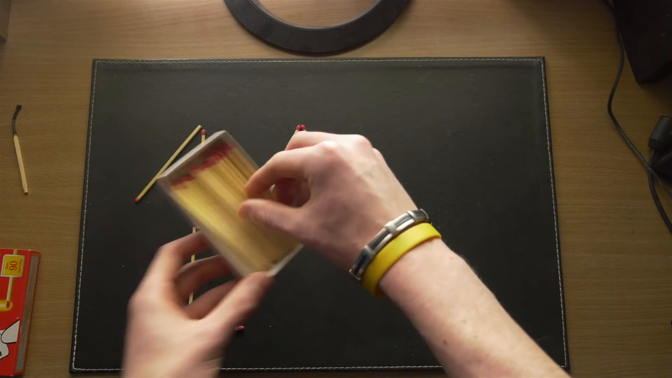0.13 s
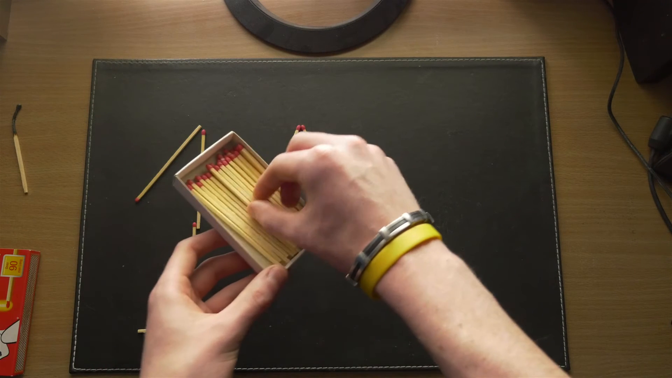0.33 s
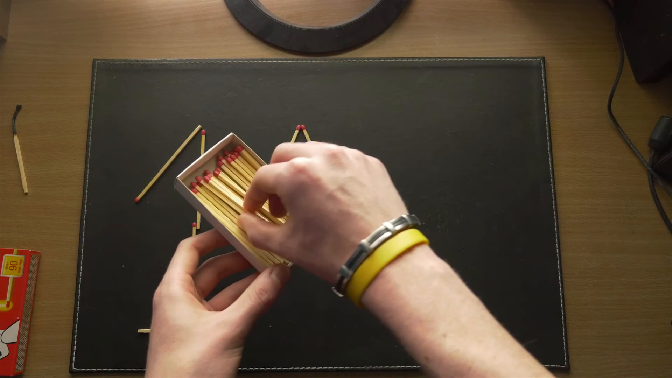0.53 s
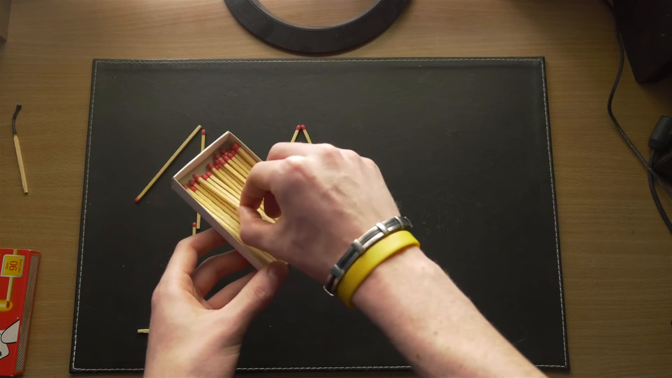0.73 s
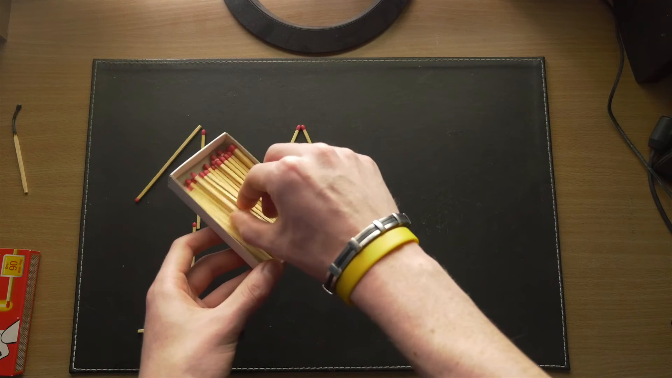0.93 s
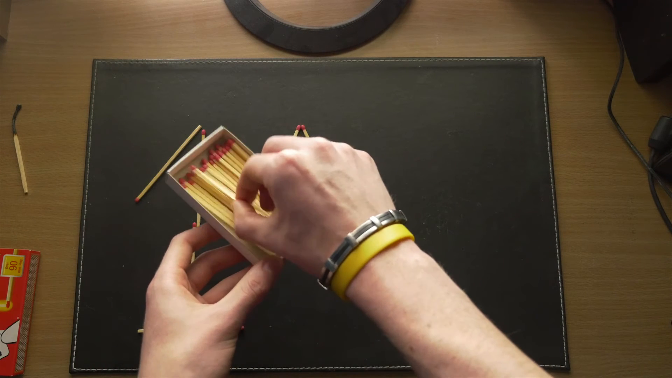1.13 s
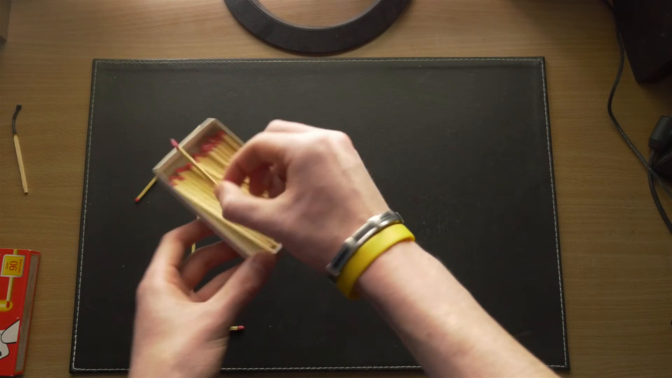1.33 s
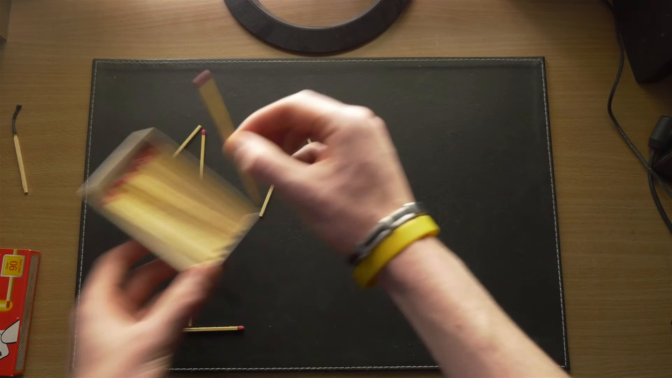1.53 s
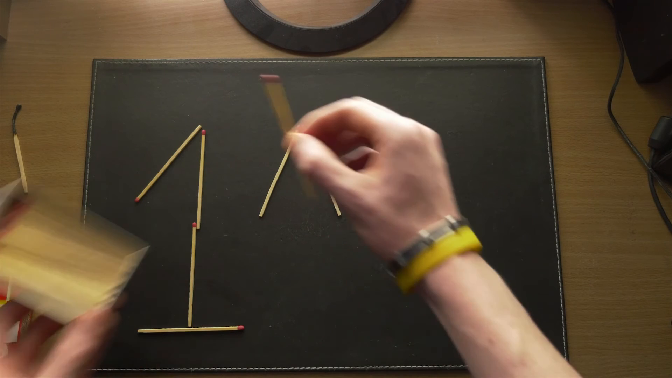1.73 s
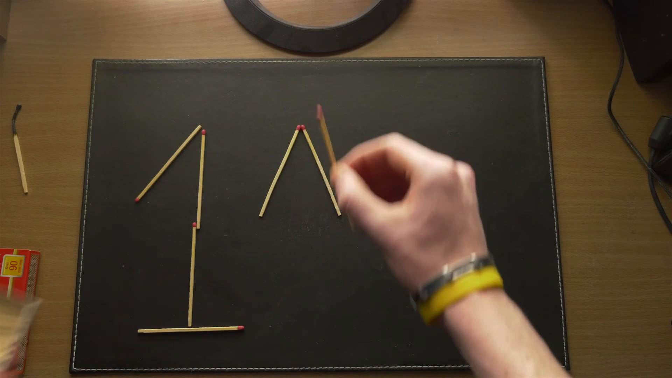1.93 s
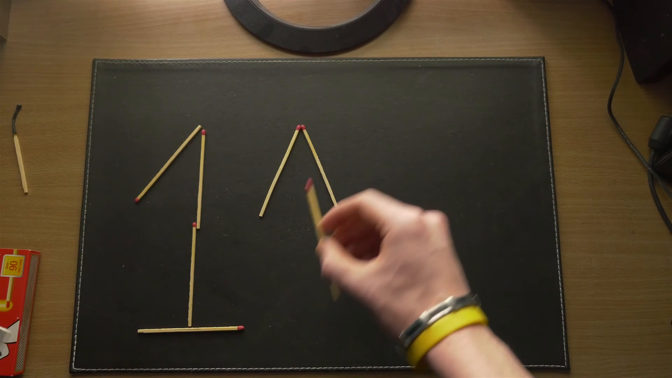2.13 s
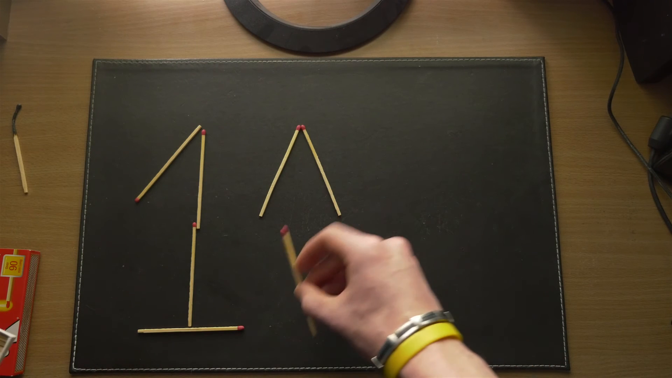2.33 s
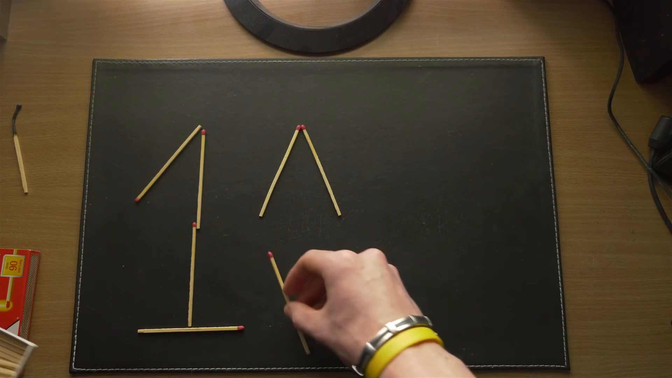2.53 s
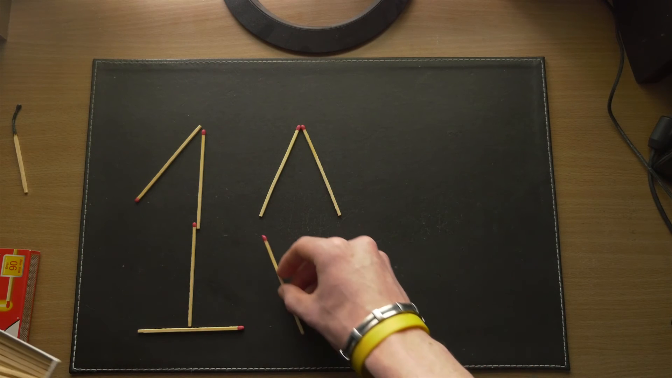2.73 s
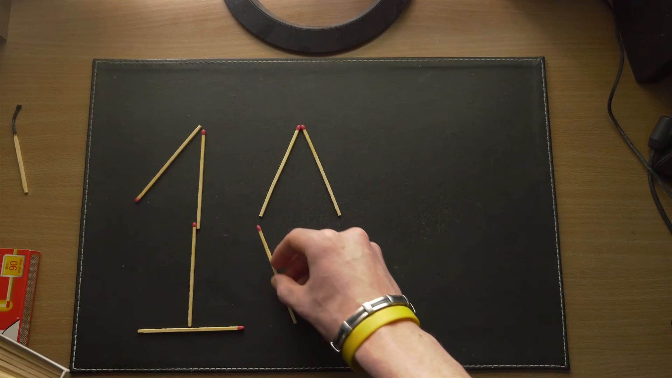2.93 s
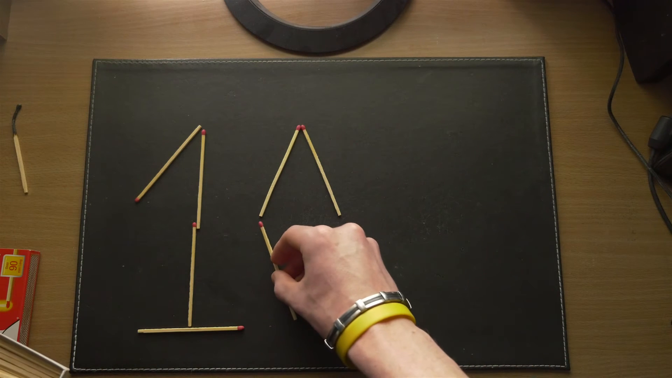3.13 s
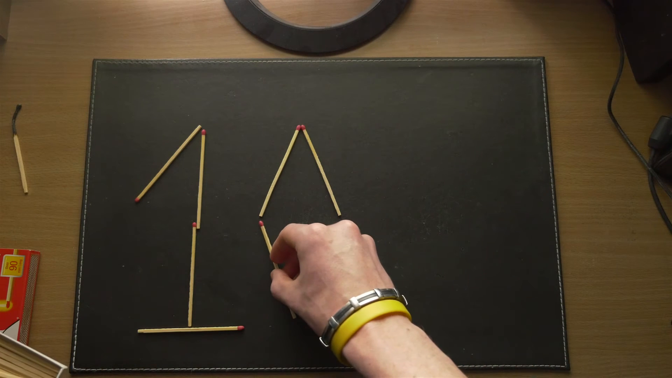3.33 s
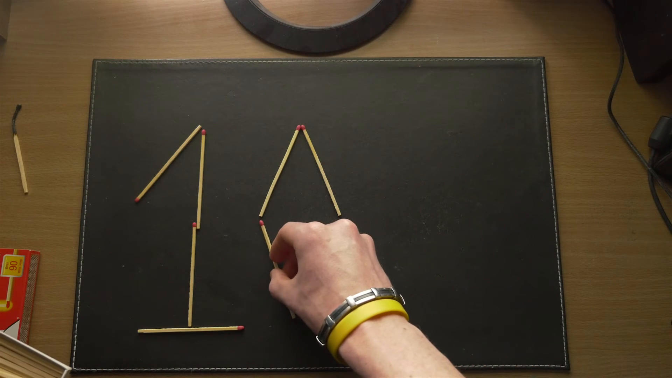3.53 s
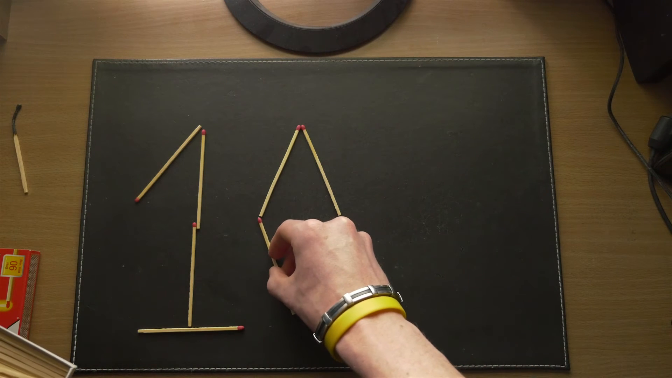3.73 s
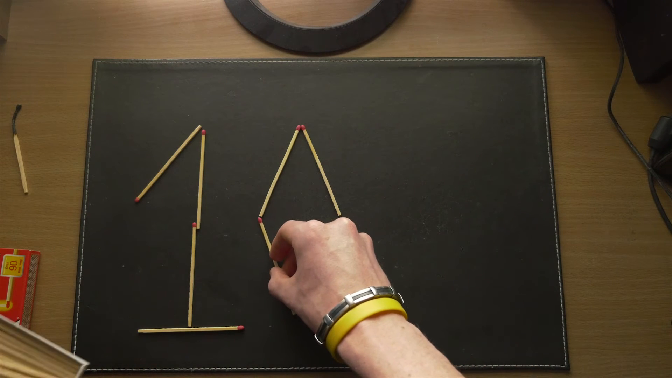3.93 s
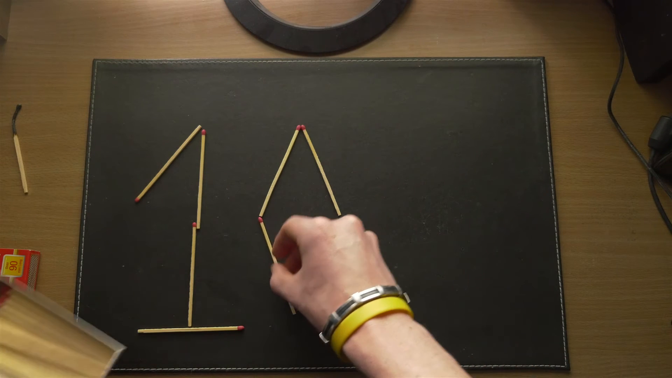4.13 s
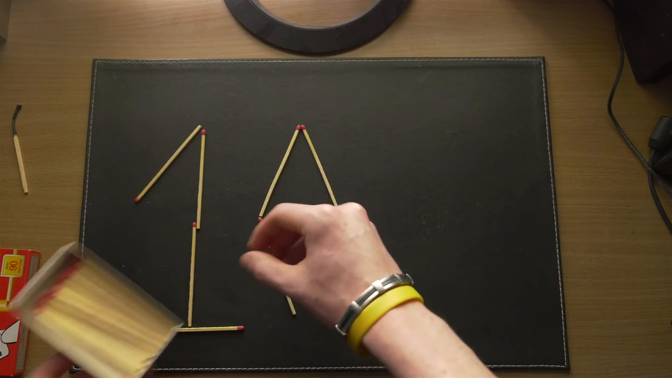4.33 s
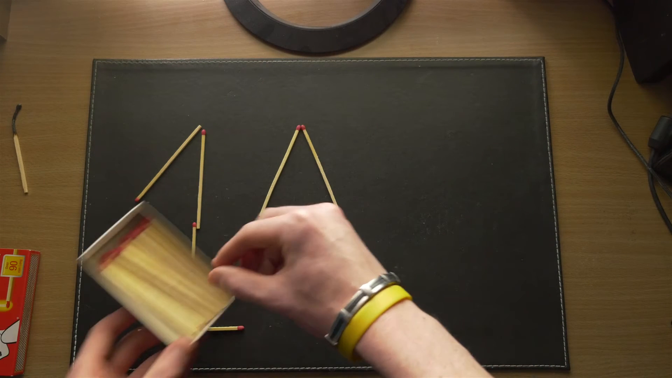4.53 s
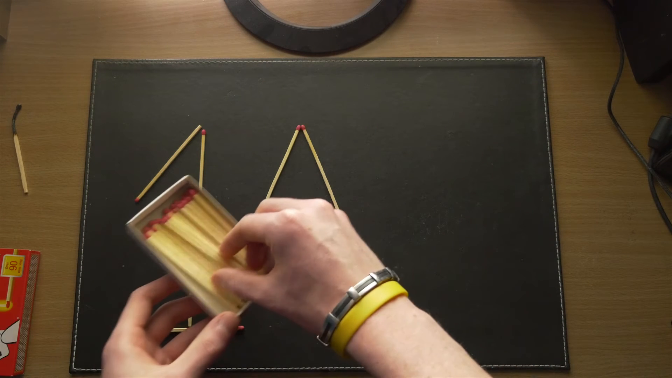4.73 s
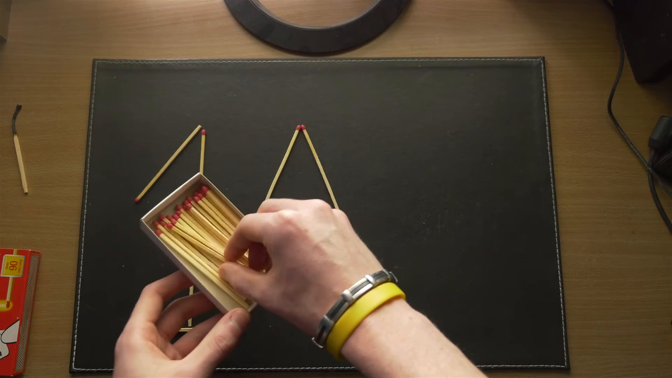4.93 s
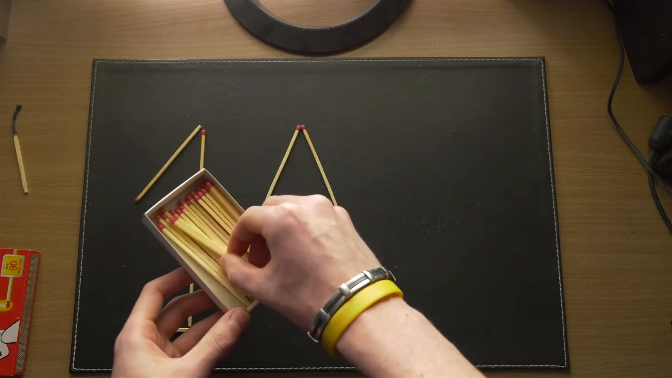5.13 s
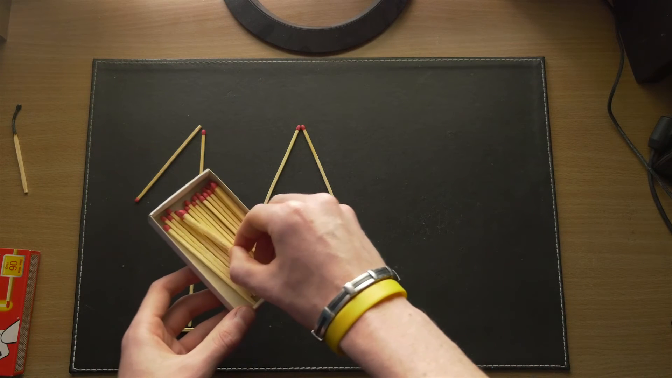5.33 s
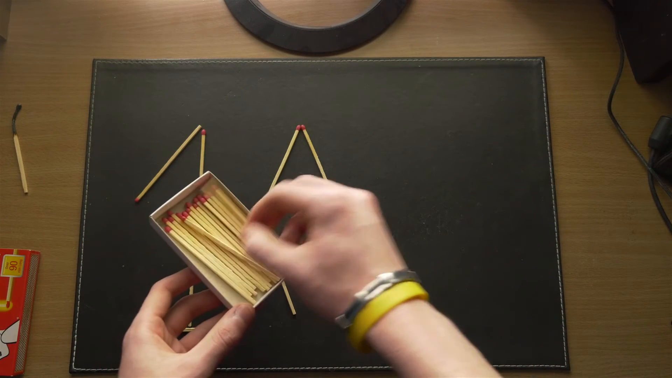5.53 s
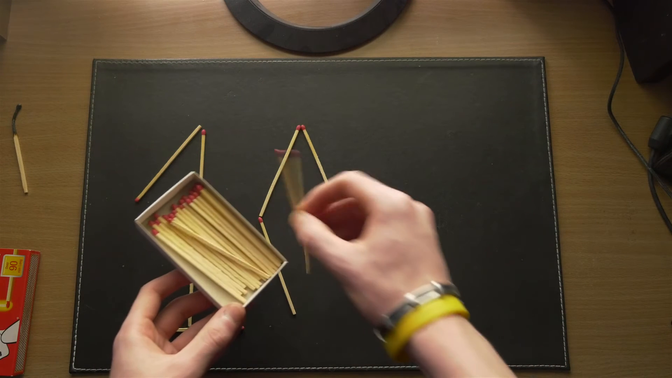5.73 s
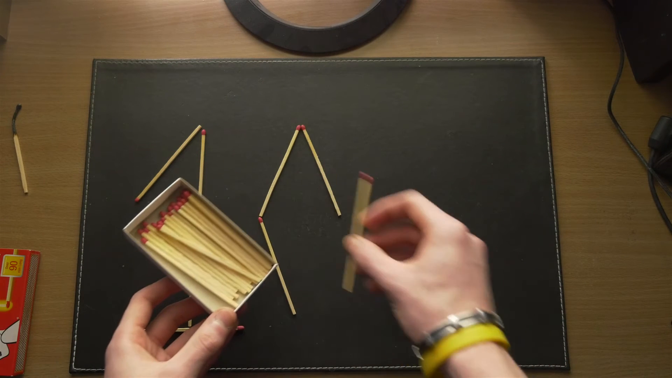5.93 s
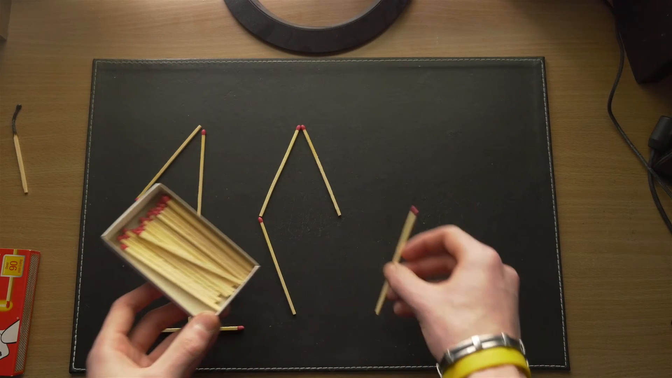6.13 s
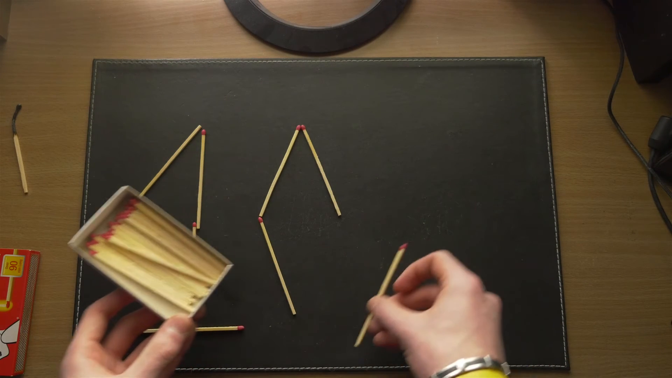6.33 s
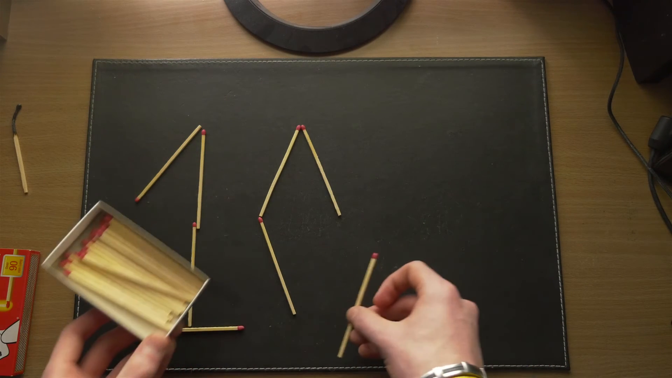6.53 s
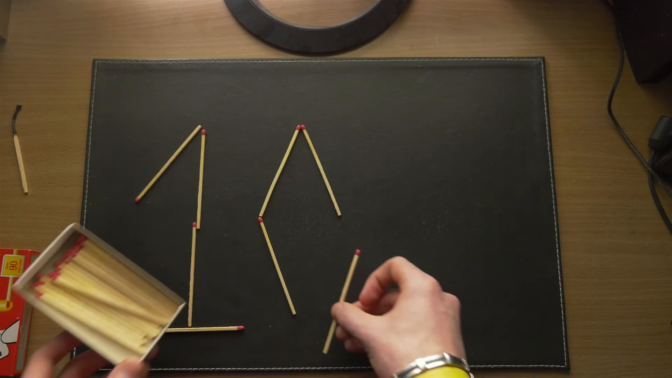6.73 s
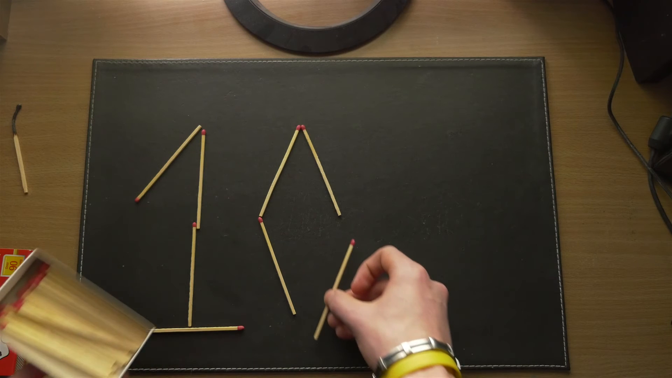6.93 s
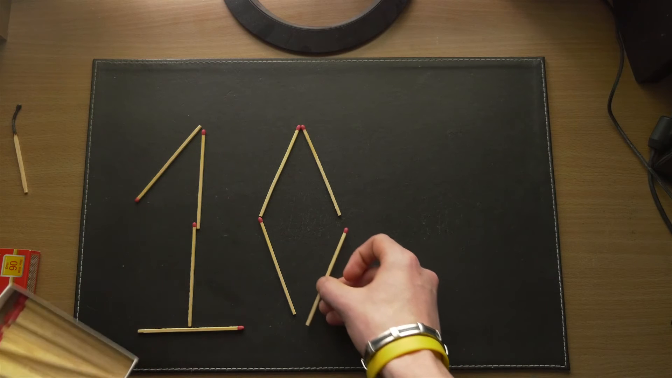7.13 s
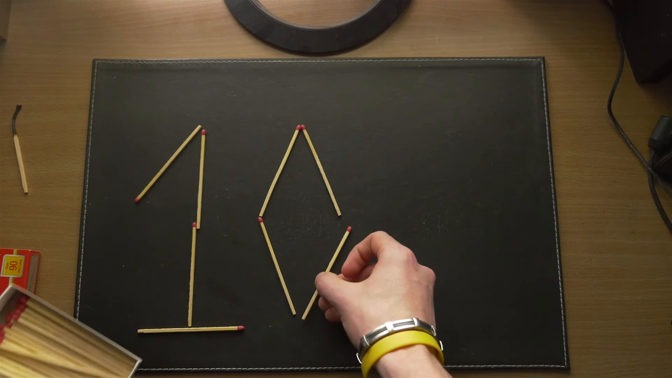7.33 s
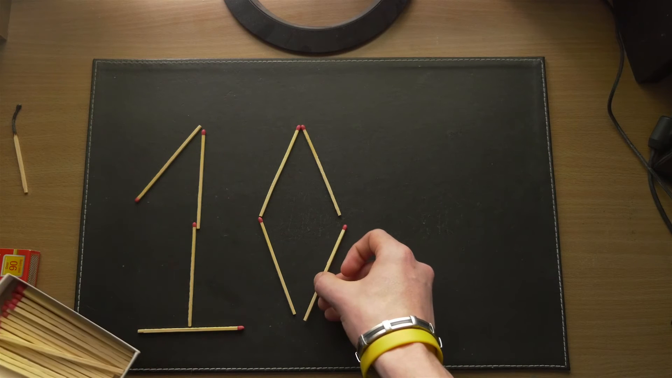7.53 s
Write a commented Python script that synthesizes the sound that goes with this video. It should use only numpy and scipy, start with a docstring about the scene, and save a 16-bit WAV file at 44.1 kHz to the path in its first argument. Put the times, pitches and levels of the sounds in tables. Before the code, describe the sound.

Fingers rummage twice through a box of wooden matches, with light ticks and soft desk thumps in a quiet room.

```python
"""Wooden matches scrape and knock as fingers dig among them in a cardboard tray, close by.
Friction and small impacts excite the resonances of sticks and tray, and single matches tick on a
leather desk pad. Blows set the low modes of the desk thumping, and a hand settles on it.
Behind them are a small quiet room, a fan hum, microphone hiss and faint birds outside."""
import sys
import numpy as np
from scipy import signal
from scipy.fft import rfft, irfft
from scipy.io import wavfile
from scipy.ndimage import uniform_filter1d, map_coordinates

SR = 44100
rng = np.random.default_rng(int(sys.argv[2]) if len(sys.argv) > 2 else 0)


def log_audio(samples):
    """Write samples as a 16-bit WAV file to the path given in sys.argv[1]."""
    # one column per channel
    frames = np.atleast_2d(samples).T
    # limit to full scale, then quantise
    limited = np.clip(frames, -1, 1)
    pcm = np.round(limited * 32767).astype(np.int16)
    wavfile.write(sys.argv[1], SR, pcm)


N = 333834

# Modes of the tray and its sticks. Each row: frequency in Hz, relative width, weight in dB.
TRAY_MODES = [(468, 14, -9.5), (1040, 29, -0.5), (2300, 140, -4), (2860, 490, 0), (3470, 79, -6.5),
              (4190, 43, 0), (5100, 99, 0), (6160, 7.3, -8), (7850, 110, -5.5), (8170, 170, -8),
              (9200, 140, -10.5), (12100, 900, -14)]
# Broad spectrum of the wood. Each row: frequency in Hz, relative level in dB.
WOOD_SPECTRUM = [(150, -51.5), (250, -22.5), (460, -12), (674, -23.5), (1060, -6.5), (1310, -3.5),
                 (2620, 0.5), (3460, -5), (4120, -1), (12100, -14.5), (16000, -23.5)]
def matches(spots=6, jumps_per_s=150, hollow_hz=1200, bright_hz=6000):
    """Modal filtering: the contact jumps between spots, each with its own mode tuning and weights."""
    grip = amp(2.5 * wander(60))  # the grip is uneven
    tumbles, out = knocks()
    force = slides() * grip + tumbles
    clicks = jostle()
    spot = rng.integers(0, spots, N)[np.cumsum(rng.random(N) < jumps_per_s / SR)]
    hz = np.fft.rfftfreq(4096, 1 / SR)
    hollow = 1 / (1 + (hz / hollow_hz) ** 8)
    bright = 1 / (1 + (bright_hz / (hz + 1)) ** 8)
    for k, scatter in enumerate(rng.standard_normal((spots, len(TRAY_MODES), 2))):
        peaks = 0
        for (mode_hz, width, db), (detune, boost) in zip(TRAY_MODES, scatter):
            offset_hz = hz - mode_hz * (1 + 0.016 * detune)
            peaks += amp(db + 4.5 * boost) / (1 + (offset_hz / (1.6 * width)) ** 2)
        gain = amp(log_interp(WOOD_SPECTRUM, hz)) * np.sqrt(1 + 4.9 * peaks)
        for push, band in zip(force, (hollow, 1 - hollow - bright, bright)):
            response = minimum_phase(gain * np.sqrt(abs(band)))
            out += signal.oaconvolve(push * clicks * (spot == k), response)[:N]
    return out + panel(force[1] * clicks)


# Knocks of sticks. Each row: start in seconds, base level in dB, brightness in dB,
# ring frequency in Hz, ring level over the base in dB, fall time of the tumble in ms.
KNOCKS = [(0.167, -33.5, -2, 2230, -10, 12), (.178, -31, -25, 2860, -4, 20),
          (0.191, -21, -18, 1040, -1, 11.5), (.2059, -22.5, -2, 970, -9, 7.9),
          (.2204, -24.5, 1, 2070, -17, 3.4), (0.286, -47, -9, 2170, -15, 4.7),
          (.315, -42, -14, 1040, -11, 5), (0.3494, -40, -3.5, 2390, -12, 8.8),
          (0.372, -34, -6, 2570, -10, 29), (.4094, -40, -10, 2130, -12, 4.6),
          (0.428, -31, -20, 2680, -8, 8), (0.4531, -30, -5, 2590, -10, 20),
          (0.4767, -25, -8, 2830, -6, 5.9), (0.511, -35, 5.5, 1720, -10, 6.6),
          (0.515, -21.5, -17, 4210, -5, 4.5), (0.5771, -27.5, -20, 1670, -3, 4.7),
          (0.5828, -29, -7, 4970, -5, 5), (0.6359, -42, -18, 2780, -8, 8.5),
          (.673, -35, -20, 2860, -6, 5.3), (0.6935, -18, -3.5, 2580, -6, 9.5),
          (0.703, -20, -6, 4700, -4, 12), (.7531, -27.5, -6.5, 2290, -9, 4.5),
          (.8117, -37.5, -6, 1600, 3.5, 10), (.854, -34, -15, 3300, -18, 7.5),
          (0.8684, -23.5, -11, 2720, -13, 11), (0.908, -28, -7, 3880, -3, 3.4),
          (0.943, -34, -2, 4100, 0, 5), (.969, -28.5, 3.5, 2310, -20, 5.8),
          (0.9909, -24.5, 0.5, 4080, -3, 4.7), (1.0155, -25.5, -8, 2250, -12, 3.1),
          (1.047, -29.5, -6, 1590, -8, 9.9), (1.073, -38, -12, 3770, -7, 5.1),
          (1.1304, -29.5, -14, 2820, -8, 3), (1.141, -27, -10.5, 2330, -10, 7.4),
          (1.1746, -22, -6, 4980, -4, 12), (1.192, -24.5, -27, 2560, -6, 12.5),
          (1.2368, -30, -8, 2520, -6, 4.5), (1.244, -32.5, -11, 2070, 1, 36),
          (1.274, -31.5, -7, 2780, -12, 7.9), (1.2933, -18.5, -11, 1120, -9.5, 4),
          (1.4345, -43.5, -0.5, 2270, 2, 7.2), (1.4599, -44, -17, 2270, -20, 6.1),
          (1.4698, -44, -20, 3600, -12, 15), (2.0388, -32.5, 6.5, 5100, -12.5, 5.4),
          (2.0535, -35.5, 1.5, 3200, -10, 12), (2.068, -32, -9.5, 2330, -10, 3.5),
          (2.1386, -36, 5, 1560, 1, 4.2), (2.163, -53, 6, 2390, -10, 5), (2.189, -41, -11, 3360, -8, 7.2),
          (2.233, -36.5, 4, 3100, 1, 6), (2.2578, -35, -11, 3470, -1.5, 2.2),
          (3.3734, -57.5, -22, 1810, -6, 4.2), (3.6618, -23.5, -13.5, 2870, -12.5, 5.7),
          (3.673, -35, -20, 1900, -10, 13.6), (4.6875, -39, -7, 2369, 4, 8.8),
          (4.7023, -33, -0.5, 2220, -5.5, 4), (4.752, -55, 12, 4240, -16, 6),
          (4.77, -48.5, -8, 1120, -5, 14), (4.812, -42.5, -10, 2390, -1.5, 7.5),
          (4.8395, -46, -14, 2520, 2, 6.5), (4.858, -62, -2.5, 3000, -10, 2.6),
          (4.87, -38.5, -5, 2470, -6, 9.6), (4.908, -38, -1, 2600, 5, 7.7),
          (4.9228, -37.5, 3, 2730, 10.5, 8.9), (4.9324, -33.5, -17, 2500, -8, 5.7),
          (5.039, -36.5, -17, 3310, 3.5, 7.2), (5.0577, -41, 4.5, 2880, 4.5, 3.3),
          (5.087, -51, -10, 2800, 7, 5), (5.1197, -39, -16, 1130, -1.5, 5),
          (5.1394, -43.5, 7.5, 2370, 2, 7.4), (5.1576, -46.5, 1, 1100, 8.5, 4),
          (5.1891, -48, -6, 2530, 10, 6.8), (5.2165, -57, 0, 2630, -7, 6.5),
          (5.289, -30, -4.5, 2160, -10, 4.7), (5.7142, -65, -2, 4570, -10, 7),
          (5.79, -65, -10, 2300, 4.5, 6), (6.996, -58.5, -20.5, 1620, -10, 6.7),
          (7.3342, -51.5, -19.5, 2870, -8.5, 9.8)]
def knocks(rise_ms=1.7, ring_t60=.015, high_ring_hz=(6380, 9200)):
    """Impact excitation: returns the tumbling force in three bands and the sticks' damped ringing."""
    force, rings = np.zeros((3, N)), np.zeros(N)
    t = np.arange(4000) / SR
    onset = 1 - np.exp(-t * 1000 / rise_ms)
    high_pitches = rng.uniform(*high_ring_hz, len(KNOCKS))
    for (start, db, bright, hz, ring_db, fall_ms), high_hz in zip(KNOCKS, high_pitches):
        tumble = onset * np.exp(-(t * 1000 / fall_ms) ** 2)  # the sticks jam, so it stops short
        band_db = db - 15 + np.array([[-15], [0], [bright]])  # hollow, middle, bright
        add(force, start, amp(band_db) * tumble / tumble.max())
        ring = amp(ring_db) * np.sin(2 * np.pi * hz * t)
        ring += amp(bright - 7.5) * np.sin(2 * np.pi * high_hz * t)
        add(rings, start, amp(db - 60 * t / ring_t60) * onset * ring)
    return force, rings


# Sticks sliding in the tray. Each row: time of full force in seconds, level in dB,
# build-up and hold in seconds, hollowness and brightness in dB.
SLIDES = [(0.06, -74.5, .03, 0.02, -6.5, -8.5), (0.194, -40.5, .03, 0.014, -5, 0),
          (.27, -67.5, .03, 0.028, -6, -6.5), (0.402, -44.5, .06, 0.086, -7, -5),
          (0.51, -34.5, .015, 0.0058, -9.5, -8.5), (0.576, -51.5, .01, 0.023, -4, -3.5),
          (0.622, -58.5, .02, .05, -9.5, -10), (.7, -31, .02, 0.0082, -11, -3.5),
          (0.733, -47, .02, 0.017, -8, -8), (0.8, -58.5, .04, 0.059, -5.5, -10.5),
          (0.866, -44.5, .02, 0.038, -10, -6), (0.968, -44, .012, 0.048, -7.5, -8),
          (1.046, -57.5, .02, 0.038, -3, -2.5), (1.173, -48, .02, 0.024, -2, 1.5),
          (1.246, -57.5, .02, 0.063, -6.5, -4), (1.467, -58, .04, .025, -6, -6),
          (2.04, -44.5, .003, 0.024, -2, 3), (2.093, -59.5, .02, 0.028, -6.5, 0),
          (2.137, -55, .012, 0.025, -5.5, -6), (2.199, -52.5, 0.024, 0.059, -6.5, 0.5),
          (4.687, -59, .01, 0.0084, -2.5, -2.5), (4.735, -67, 0.018, .1, -5, -6),
          (4.892, -63, 0.036, 0.014, 0.5, -5), (4.928, -42, 0.029, 0.0064, -12, -3),
          (4.944, -56.5, .01, 0.014, -6, -3.5), (5.034, -59, .01, 0.013, -4, -6.5),
          (5.078, -73, .02, .12, -4, -11), (5.286, -60, 0.0036, 0.016, -4, -5),
          (5.775, -78.5, .03, .02, -6, -2.5)]
def slides(build_db=25.5, fade_db_per_s=700):
    """Sliding friction: force in three bands builds suddenly as the sticks slip, holds, then fades."""
    force = np.zeros((3, N))
    for full_at, db, build, hold, hollow, bright in SLIDES:
        t = np.arange(-build, hold + .3, 1 / SR)
        swell = np.clip(1 + t / build, 0, 1) ** 1.7
        level = db - build_db * (1 - swell) - fade_db_per_s * np.maximum(t - hold, 0)
        add(force, full_at - build, amp(level + np.array([[hollow], [0], [bright]])))
    return force


def jostle(clicks_per_s=3500, snaps_per_s=90):
    """Shot noise: tiny collisions between sticks give dense clicks and some snaps over fine friction."""
    sizes = amp(0.49 * np.minimum(rng.exponential(1, N), 3.5))
    clicks = unit_rms(sizes * (rng.random(N) < clicks_per_s / SR))
    snaps = amp(15) * (rng.random(N) < snaps_per_s / SR)
    collisions = (clicks + snaps) * rng.choice([-1., 1.], N)
    return unit_rms(collisions + 0.46 * rng.standard_normal(N))


# Panels or sticks that the grip leaves free to ring. Each row: start and end in seconds,
# frequency and bandwidth in Hz, gain in dB. Only rows that end after they start sound.
FREE_MODES = [(0.5, 1.6, 2700, 250, -12.5), (2, 2.11, 3310, 380, -6.5), (4.6, 4.7, 2650, 160, -7.5),
              (4.72, 3.9, 4750, 150, -3), (4.745, 4.8, 8500, 200, -2), (2.5, 2.1, 483, 150, -11.5),
              (5.13, 5.17, 9000, 180, -10.5), (10, 5.2, 1170, 120, -6)]
def panel(drive):
    """Forced resonance: the collisions shake each free part as a single damped mode."""
    out, t = np.zeros(N), np.arange(2000) / SR
    for start, end, hz, width, db in FREE_MODES:
        mode = np.exp(-np.pi * width * t) * np.sin(2 * np.pi * hz * t)
        shaking = drive[round(start * SR):round(end * SR)]
        add(out, start, amp(db) * signal.oaconvolve(shaking, mode / np.linalg.norm(mode)))
    return out


# Blows passed through the desk. Each row: start in seconds, then each desk mode's gain in dB.
THUMPS = [(0.199, -31.5, -41.5, -23, -61, -64, -58), (2.04, -49, -40.5, -60.5, -45.5, -39, -38.5),
          (3.663, -66, -69, -70.5, -63, -63.5, -54.5)]
# Modes of the desk top. Each row: frequency in Hz, swell time and 60 dB decay time in seconds.
DESK_MODES = [(18.6, .012, .9), (48, 0.018, 0.64), (107.46, .04, .4), (200.4, 0.0026, 0.102),
              (291.7, 0.0034, 0.14), (657, 0.003, 0.047)]
def desk():
    """Damped vibration: after a blow, the desk's low modes swell and die away exponentially."""
    out, t = np.zeros(N), np.arange(SR) / SR
    for start, *levels in THUMPS:
        for db, (hz, swell, t60) in zip(levels, DESK_MODES):
            envelope = amp(db - 60 * t / t60) * (1 - np.exp(-t / swell)) ** 2
            add(out, start, envelope * np.sin(2 * np.pi * hz * t))
    return out


# A hand settling on the desk. Each row: start in seconds, push length in seconds, peak in dB.
LEANS = [(2.471, 0.074, -46.5), (2.615, 0.11, -50.5)]
def hand():
    """Elastic deflection: the desk gives under a soft push and springs back without ringing."""
    out = np.zeros(N)
    for start, length, db in LEANS:
        progress = np.linspace(0, 2, round(2 * length * SR))
        add(out, start, amp(db) * np.sin(np.pi * progress) ** 2 * np.where(progress < 1, 1, -.4))
    return out


# Distant chirps. Each row: start and length in seconds, first and last pitch in Hz, relative level in dB.
CHIRPS = [(.055, 0.073, 4700, 4500, -80), (0.092, 0.068, 4100, 3580, -83), (1.349, 0.096, 4530, 4040, -77),
          (1.646, 0.072, 4940, 4030, -85.5), (1.74, 0.035, 4300, 3590, -90), (2.702, .12, 4210, 3760, -93),
          (2.87, .1, 5100, 4700, -93), (3.071, 0.091, 4800, 3250, -90.5), (3.528, .06, 4840, 4550, -85.5),
          (3.536, 0.0504, 4200, 3820, -90), (3.587, 0.041, 3680, 3680, -77.5),
          (3.736, .05, 3040, 2930, -89.5), (4.286, 0.063, 4420, 4290, -89.5),
          (4.624, 0.07, 4630, 4640, -90.5), (5.714, .06, 4610, 4570, -83), (5.755, 0.074, 4290, 3330, -84),
          (7.068, 0.059, 4620, 4500, -92), (7.133, 0.047, 3700, 3560, -91)]
def birds():
    """Random modulation of pitch and level makes short, mostly falling glides sound hoarse."""
    out = np.zeros(N)
    for start, length, first_hz, last_hz, db in CHIRPS:
        progress = np.linspace(0, 1, round(length * SR))
        smooth_noise = unit_rms(uniform_filter1d(rng.standard_normal((2, 8000)), 90))
        warble, flutter = smooth_noise[:, :len(progress)]
        hz = (first_hz + (last_hz - first_hz) * progress) * (1 + 0.037 * warble)
        envelope = amp(db + 3) * (1.5 + 0.68 * flutter) * np.sin(np.pi * progress)
        add(out, start, envelope * np.sin(2 * np.pi * np.cumsum(hz) / SR))
    return out


# Decay of the small room. Each row: frequency in Hz, 60 dB decay time in seconds.
ROOM_DECAY = [(300, .17), (2500, .17), (6000, .12), (12000, .075)]
def room(sound):
    """Reverberation: sparse random reflections die away, the treble first."""
    taps = np.zeros(SR // 2)
    slots = np.arange(100, SR // 2 - 20, 20)
    taps[slots + rng.integers(0, 20, len(slots))] = rng.choice([-1., 1.], len(slots))
    hz, t, spectra = signal.stft(taps, SR, nperseg=128)
    decay = amp(-60 * t / log_interp(ROOM_DECAY, hz)[:, None])
    tail = signal.istft(spectra * decay, SR, nperseg=128)[1]
    return signal.oaconvolve(sound, tail / np.linalg.norm(tail))[:N]


# Room rumble and microphone hiss. Each row: frequency in Hz, relative spectral density in dB.
AIR_SPECTRUM = [(9, -9.5), (16, 4), (30, -7.5), (80, -15.5), (150, -21.5), (340, -27.5), (410, -26),
                (480, -34.5), (1140, -40.5), (1500, -39.5), (1800, -36.5), (2200, -44.5), (4670, -49.5),
                (11600, -52.5), (12300, -73.5)]
# Fan hum and two faint high whines. Each row: frequency in Hz, rms level in dB, waver in Hz.
HUM_TONES = [(119.7, -70.5, 0.62), (9600, -108, 2), (11540, -94.5, 3)]
def air(noise_db=-63):
    """Stationary coloured noise lies under tones that waver in pitch and level."""
    colour = amp(log_interp(AIR_SPECTRUM, np.fft.rfftfreq(N, 1 / SR)))
    out = amp(noise_db) * unit_rms(irfft(rfft(rng.standard_normal(N)) * colour, N))
    for hz, db, waver in HUM_TONES:
        peak = np.sqrt(2) * amp(db + wander(6.5))
        out += peak * np.sin(2 * np.pi * np.cumsum(hz + waver * wander(13)) / SR)
    return out


def amp(db):
    """Decibels to gain."""
    return 10 ** (np.asarray(db) / 20)


def unit_rms(x):
    """Scales to rms 1."""
    return x / np.sqrt(np.mean(x ** 2) + 1e-20)


def log_interp(points, hz):
    """Interpolates a table on a log-frequency axis."""
    known_hz, values = np.transpose(points)
    return np.interp(np.log(hz + 1), np.log(known_hz + 1), values)


def add(mix, start, sound):
    """Superposition: mixes a sound in at a start in seconds."""
    part = mix[..., round(start * SR):][..., :sound.shape[-1]]
    part += sound[..., :part.shape[-1]]


def minimum_phase(gain):
    """Causal impulse response of energy 1 for a one-sided gain."""
    log = np.log(np.maximum(gain, gain.max() * 1e-4))
    log = np.concatenate([log, log[-2:0:-1]])
    phase = -signal.hilbert(log).imag
    taps = np.fft.ifft(np.exp(log + 1j * phase)).real[:len(log) // 4]
    return taps / np.linalg.norm(taps)


def wander(points_per_s):
    """Smooth random curve of rms near 1."""
    points = rng.standard_normal(int(N / SR * points_per_s) + 4)
    return map_coordinates(points, [np.arange(N) / SR * points_per_s], order=3)


def scene():
    """Superposition: matches and birds reverberate, over the desk, the hand and the room air."""
    sticks, chirps = matches(), birds()
    reflections = room(amp(-12) * sticks + amp(-3.5) * chirps)
    return (sticks + chirps + reflections + desk() + hand() + air())[None]


def record(dry):
    """Band limiting: a steep low-pass removes the highest treble."""
    lowpass = signal.firwin(511, 15900, window=("kaiser", 9), fs=SR)
    return signal.oaconvolve(dry, lowpass[None], "same")


dry = scene()
out = record(dry)
log_audio(out)
```